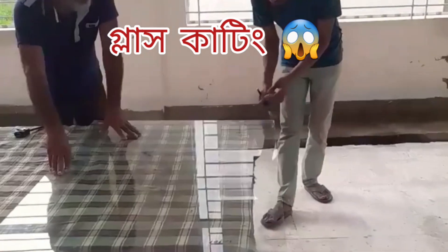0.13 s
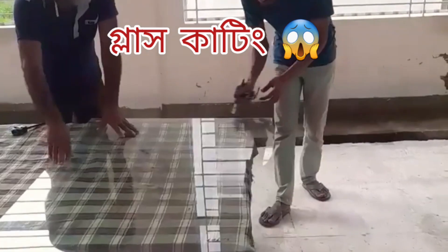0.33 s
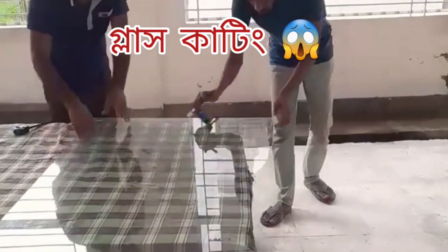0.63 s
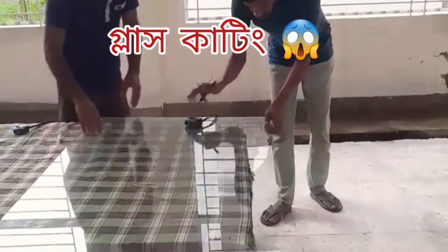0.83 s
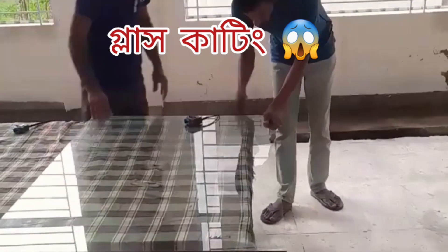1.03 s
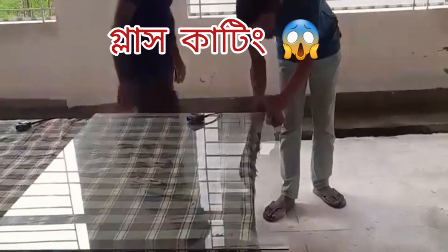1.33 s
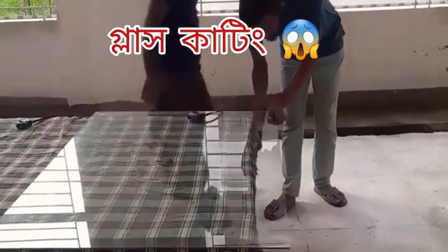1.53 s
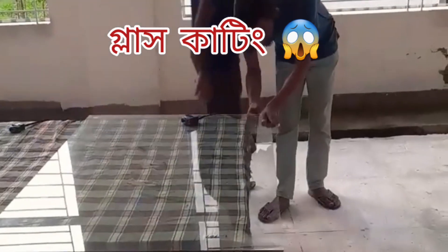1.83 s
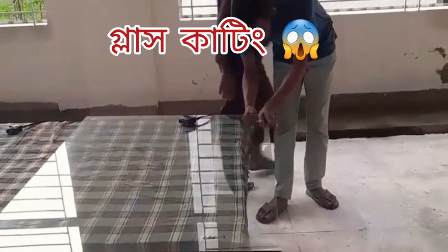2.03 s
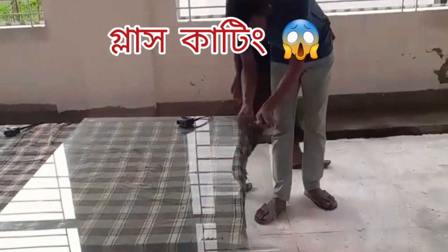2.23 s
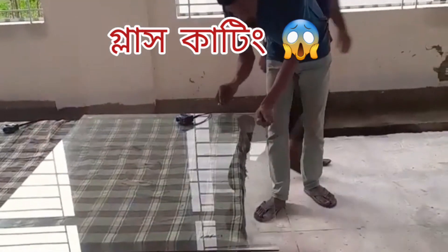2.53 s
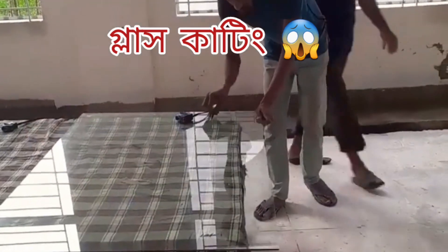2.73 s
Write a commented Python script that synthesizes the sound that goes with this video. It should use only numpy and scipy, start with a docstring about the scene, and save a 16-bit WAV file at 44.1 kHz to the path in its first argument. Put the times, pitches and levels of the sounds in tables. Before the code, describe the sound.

Glass breaking along a score: hard taps, a hollow tool knock, then a loud snap and shimmering ring

```python
"""A bare room, close by a cloth-covered table with a scored glass sheet on it, heard in stereo.
A cutter ticks, taps the glass and is laid down with a knock; the sheet snaps along the score, thumps
on the table, sheds splinters and rings on; the cutter taps it once more. Behind lie rumble, hiss and a hum.
Taps, pings and the strip are sums of damped sines; ticks, rattles, knock, crack and clashes are shaped
noise bursts; the sheet's ring is slightly uneven noise dying band by band; the thump is a sagging sine."""
import sys
import numpy as np
from scipy import signal
from scipy.fft import rfft, irfft, next_fast_len
from scipy.io import wavfile
from scipy.ndimage import map_coordinates

SR = 44100
rng = np.random.default_rng(int(sys.argv[2]) if len(sys.argv) > 2 else 0)


def file_out(sig):
    """Save sig as 16-bit WAV at sys.argv[1]."""
    # one column per channel
    cols = np.atleast_2d(sig).T
    # limit, then scale
    lim = np.clip(cols, -1, 1)
    pcm = np.round(lim * 32767).astype(np.int16)
    wavfile.write(sys.argv[1], SR, pcm)


N = 127008  # samples in the scene

# the crack running along the score, step by step: [t/s, level/dB, t60/s]
CRACK_STEPS = [(1.8948, -12, 0.042), (1.8977, -6.5, 0.017), (1.9000, -20, 0.013), (1.9040, -20, 0.14)]
BAND_LIMIT_HZ = 15350
CONTACT_LEAD_S = 0.00006  # left ahead of right


def amp(db):
    """Decibels to gain."""
    return 10 ** (np.asarray(db) / 20)


def unit(x):
    """Scale to rms 1."""
    return x / np.sqrt(np.mean(x ** 2) + 1e-20)


def along(points, hz):
    """Read a curve of (f/Hz, value) points on a log frequency axis."""
    f, v = np.transpose(points)
    return np.interp(np.log(hz + 1), np.log(f + 1), v)


def curves(rows):
    """One value per sample for each column after the time."""
    s, *columns = np.transpose(rows)
    return [np.interp(np.arange(N) / SR, s, column) for column in columns]


def since(s):
    """Seconds since a moment, zero before it."""
    return np.maximum(np.arange(N) / SR - s, 0)


def wobble(rate):
    """A smooth random curve, rate knots a second."""
    knots = rng.standard_normal(4096)
    return map_coordinates(knots, [np.arange(N) * rate / SR + 2], mode="mirror")


def filtered(x, response):
    """Multiply the spectrum of x by a response of frequency."""
    m = next_fast_len(N + 8192)  # spare length, so that little wraps round
    hz = np.fft.rfftfreq(m, 1 / SR)
    return irfft(rfft(x, m) * response(hz), m)[..., :N]


def sides(pan_db):
    """Left and right gains from their difference in dB (positive is left)."""
    pan_db = np.atleast_1d(pan_db)
    return amp(np.array([pan_db, -pan_db]) / 2)


def place(x, pan_db, lead_s):
    """Level and arrival time differ between the two sides of the microphone; the left leads."""
    ears = np.array([[1], [-1]])
    return filtered(x, lambda hz: sides(pan_db) * np.exp(np.pi * 1j * hz * lead_s * ears))


def noise(colour, alike):
    """Coloured stereo noise of rms 1: mid and side shares set how alike left and right are."""
    def shares(hz):
        turn = np.arccos(np.clip(along(alike, hz), -1, 1)) / 2
        return amp(along(colour, hz)) * [np.cos(turn), np.sin(turn)]

    mid, side = filtered(rng.standard_normal((2, N)), shares)
    return unit(np.array([mid + side, mid - side]))


def fade(s, t60, rise_s):
    """Quick rise at a moment, then exponential decay."""
    t = since(s)
    return (1 - np.exp(-t / rise_s)) * amp(-60 * t / t60)


def ring(s, modes, rise_s):
    """Damped modes set off at a moment, each a decaying sine; 0.75 s long."""
    t = np.arange(SR * 3 // 4) / SR
    sound = sum(amp(db - 60 * t / t60) * np.sin(2 * np.pi * hz * t) for hz, db, t60 in modes)
    sound = sound * (1 - np.exp(-t / rise_s))
    return np.pad(sound, (round(s * SR), N))[:N]


def dying(x, s, t60s):
    """From a moment on, each frequency dies at its own speed."""
    hz, t, z = signal.stft(x, SR, nperseg=256)
    decay = amp(-60 * np.maximum(t - s, 0) / along(t60s, hz)[:, None])
    return signal.istft(z * decay, SR, nperseg=256)[1][:, :N]


def in_room(x, room_db):
    """Add the diffuse tail of the bare walls: noise that dies band by band, fed by the right side."""
    # reverberation of the room: [f/Hz, t60/s]
    room_t60 = [(200, 0.42), (1000, 1), (3000, 0.92), (7000, 1), (15000, 1)]
    tail = dying(rng.standard_normal((2, N)), 0, room_t60)
    tail = tail * (1 - np.exp(-since(0) / 0.00079))  # soft onset, s
    wet = signal.fftconvolve(x[1:], tail / np.linalg.norm(tail[0]), axes=1)[:, :N]
    return x + amp(room_db) * sides(pan_db=-2.5) * wet


def bursts(rows, colour, alike, pan_db):
    """Hard, gritty contacts: each a burst of noise standing for a crowd of short-lived modes."""
    power = sum((amp(db) * fade(s, t60, rise_s=0.00086)) ** 2 for s, db, t60 in rows)
    grit = unit(amp(1.5 * wobble(rate=700)))  # 1.5 dB of roughness
    crowd = noise(colour, [(1000, alike)])
    return place(np.sqrt(power) * grit * crowd, pan_db, CONTACT_LEAD_S)


def background():
    """Rumble and hiss of the surroundings: three bands of noise with drifting levels."""
    # bass and low middle in time: [t/s, bass level/dB, low-middle level/dB]
    low_levels = [(0, -33.5, -33), (.2, -37.5, -34), (.45, -37, -34), (.67, -33.5, -31.5), (.8, -45, -29.5),
                  (1.05, -38.5, -31.5), (1.3, -37.5, -31.5), (1.47, -32.5, -33), (1.58, -36, -28),
                  (1.85, -35, -30.5), (2.0, -40.5, -35.5), (2.25, -39.5, -35.5), (2.38, -43.5, -38.5),
                  (2.55, -39.5, -39), (2.7, -41, -40.5), (2.88, -41, -38)]
    # hiss in time: [t/s, level/dB]
    hiss_level = [(0, -41.5), (.6, -41.5), (1.25, -42), (1.65, -39), (1.88, -42), (2.0, -40.5), (2.8, -47)]
    # spectra of the three bands: [f/Hz, level/dB]
    bass_colour = [(20, -38), (32, -19), (40, -2), (47, -1), (65, -4.5), (100, -3.5), (130, -10.5),
                   (200, -16.5), (400, -64)]
    rumble_colour = [(70, -71), (130, 0), (165, -1.5), (240, -5.5), (320, -3), (450, -7), (620, -6),
                     (900, -16.5), (1300, -21.5), (3000, -46.5)]
    hiss_colour = [(300, -64), (900, 1.5), (1900, 4.5), (2700, -5), (4500, -6), (7000, -11), (8500, -16),
                   (11000, -13), (14000, -15.5), (15500, -48)]
    # likeness of left and right: [f/Hz, correlation]
    likeness = [(60, 0.88), (160, 1), (350, 0.78), (700, 0.068), (1500, 0.028), (5000, 0.027)]
    # balance: [f/Hz, left minus right/dB]
    balance = [(40, -1), (150, -2.3), (400, -2.5), (1500, -3), (12000, -2)]
    levels = curves(low_levels) + curves(hiss_level)
    colours = (bass_colour, rumble_colour, hiss_colour)
    layers = sum(amp(db) * noise(colour, likeness) for db, colour in zip(levels, colours))
    return filtered(layers, lambda hz: sides(along(balance, hz)))


def tone(hz, drift_hz, flutter_db):
    """A sine of rms 1 whose pitch and level wander slightly."""
    turns = np.cumsum(hz + drift_hz * wobble(rate=14)) / SR
    return unit(np.sin(2 * np.pi * turns) * amp(flutter_db * wobble(rate=22)))


def hum():
    """A distant machine sings one wavering note over low drones."""
    # the note in time: [t/s, level/dB]
    note_level = [(0, -28.5), (.3, -34.5), (.7, -34), (1.2, -35), (1.85, -33), (1.93, -43), (2.3, -36),
                  (2.85, -42)]
    # drones that swell and fade: [middle t/s, half length/s, f/Hz, level/dB]
    swells = [(0.23, 0.72, 99, -36.5), (1.614, .1, 167, -29), (2.54, 0.22, 167, -43.5),
              (1.45, 0.34, 49, -43.5)]
    note = amp(curves(note_level)[0]) * tone(541.3, drift_hz=2.97, flutter_db=2.0)
    drones = 0
    for s, half, hz, db in swells:
        swell = np.exp(-((since(0) - s) / half) ** 2 / 2)
        drones = drones + amp(db) * swell * tone(hz, drift_hz=1.47, flutter_db=2.5)
    return place(note, pan_db=-6, lead_s=0.00032) + drones


def cutter_handle():
    """The handle drops flat and bounces: hollow knocks, the first of which sets its modes ringing."""
    # landing and bounces: [t/s, level/dB, t60/s]
    landings = [(0.7770, -4.5, .016), (0.7850, -21, 0.037), (0.7950, -18, 0.045), (0.8045, -22, 0.1),
                (0.8420, -25, 0.038), (0.8710, -25.5, .08)]
    # spectrum of a knock: [f/Hz, level/dB]
    knock_colour = [(200, -25), (480, -15), (660, 1), (850, 2), (1080, 0), (1250, -10), (1450, -13),
                    (1780, -7), (2600, -23), (6000, -25), (15000, -29)]
    # modes of the handle: [f/Hz, level/dB, t60/s]
    handle_modes = [(625, -39, 0.27), (780, -33, .2), (830, -28, 0.16), (915, -20, 0.14), (1030, -25, 0.11),
                    (1150, -26, 0.16), (1726, -25, 0.089)]
    body = ring(landings[0][0], handle_modes, rise_s=0.0016)
    body = place(body, pan_db=-1, lead_s=CONTACT_LEAD_S)
    knocks = bursts(landings, knock_colour, alike=0.23, pan_db=-5.0)
    return in_room(body + knocks, room_db=-5.5)


def cutter_parts():
    """The wheel ticks and skids, its steel holder pings and the loose metal parts rattle."""
    # rattles, wheel ticks and skids between contacts: [t/s, level/dB, t60/s]
    rattle_rows = [(0.6880, -22.5, 0.06), (0.7382, -19, 0.037), (0.7450, -28, 0.025), (0.7775, -23, 0.017),
                   (2.8445, -21, 0.071), (2.8600, -34, 0.074)]
    tick_rows = [(0.3168, -33, 0.046), (0.3265, -33, 0.07), (0.3350, -25, 0.02), (0.3374, -17, 0.015),
                 (0.6876, -19.5, 0.012), (0.6940, -30, 0.0086), (0.7765, -18, 0.011), (0.8018, -26, .008),
                 (0.8410, -23, 0.0098), (2.8450, -22, .014)]
    skid_rows = [(0.335, -37.5, 0.4), (0.692, -27, 0.64), (0.838, -31, 0.35)]
    # their spectra: [f/Hz, level/dB]
    rattle_colour = [(500, 1), (1500, -5), (2600, 1), (3700, -3), (5400, -4.5), (6800, -6.5), (9000, -13.5),
                     (12000, -12.5), (15500, -34)]
    tick_colour = [(1000, -23), (2500, -1), (3300, -6), (5000, 3.5), (8500, -6), (10800, -4), (11900, 10),
                   (12900, 2), (15500, -8)]
    skid_colour = [(1500, 5.5), (4000, -2), (7000, -5), (9000, -6.5), (12000, -12), (15000, -4)]
    # pings of the holder: [t/s, level/dB]
    ping_rows = [(0.74, -23), (0.75, -22), (0.766, -20), (0.8400, -34), (2.8429, -17.5), (2.853, -20),
                 (2.8714, -17)]
    # modes of the holder: [f/Hz, level/dB, t60/s]
    ping_modes = [(4600, -11, .04), (4830, -10, 0.061), (5360, -4.5, 0.03), (5530, -2.5, 0.028),
                  (5840, -9.5, 0.039), (6520, -19, 0.04)]
    rattle = in_room(bursts(rattle_rows, rattle_colour, alike=0.24, pan_db=-6.5), room_db=1.5)
    ticks = in_room(bursts(tick_rows, tick_colour, alike=0.17, pan_db=-8.0), room_db=-12.5)
    pings = sum(amp(db) * ring(s, ping_modes, rise_s=0.00094) for s, db in ping_rows)
    pings = in_room(place(pings, pan_db=-8.0, lead_s=0.00003), room_db=-23)
    skids = bursts(skid_rows, skid_colour, alike=0.1, pan_db=-1)
    return rattle + ticks + pings + skids


def cutter_taps():
    """The head strikes the damped sheet, early reflections follow from nearby surfaces; the spot picks the modes."""
    # taps and their early reflections: [t/s, level/dB, left minus right/dB, spot struck (0 first, 1 second)]
    tap_rows = [(0.6855, 1.5, -7.5, 0), (0.6897, -18, -4, 0), (0.6929, -25, 2, 0), (0.6957, -15, -4, 0),
                (0.7380, -8, -4, 0), (2.8430, -3, -8, 1), (2.8462, -28, 10, 1)]
    # modes of a tap: [f/Hz, level at first spot/dB, level at second spot/dB, t60/s]
    tap_modes = [(820, -21, -35, 0.028), (1225, -19.5, -20.5, 0.036), (1882, -14, -4.5, 0.025),
                 (2095, -14, -12.5, 0.062), (2223, -5, -28, 0.024), (2410, -10, -25, 0.031),
                 (2734, 2.4, 5.2, 0.015), (2880, -6.5, -2.2, 0.028), (3110, -14.5, -12, 0.046),
                 (3825, -23, -25, 0.039)]
    attack_s = 0.0014
    taps = 0
    for s, db, pan, spot in tap_rows:
        modes = [(hz, second if spot > 0.5 else first, t60) for hz, first, second, t60 in tap_modes]
        soft_contact = 1 - np.exp(-since(s) / attack_s)  # on top of the rise inside ring
        arrival = soft_contact * ring(s, modes, attack_s)
        taps = taps + amp(db) * place(arrival, pan, lead_s=0.00008)
    return in_room(taps, room_db=-13.5)


def thump():
    """The halves of the sheet drop onto the padded table: a low sine sagging in pitch as they settle."""
    start_s = 1.8995
    hz = 42 + 40 * np.exp(-since(start_s) / 0.0096)  # from 82 Hz down to 42 Hz
    turns = np.cumsum(hz * (since(start_s) > 0)) / SR
    return amp(-14.5) * fade(start_s, t60=0.079, rise_s=0.0019) * np.sin(2 * np.pi * turns)


def splinters():
    """Tiny chips tick at random along the break, ever fainter, each a short decaying sine."""
    rate, crackle_t60 = 320, 0.96  # chips a second; fade of the crackle, s
    typical_db, spread_db = -22.5, 1.5
    typical_hz, spread_octaves, cycles = 4200, 0.48, 42  # a chip falls 60 dB in so many cycles
    jitter, size, pitch, side = rng.standard_normal((180, 4)).T
    delay = np.abs(np.arange(len(jitter)) + jitter) / rate
    steps = np.arange(600)  # samples in a chip
    hz = np.minimum(typical_hz * 2 ** (spread_octaves * pitch), BAND_LIMIT_HZ)
    turns = hz[:, None] * steps / SR
    level_db = typical_db + spread_db * size - 60 * delay / crackle_t60
    chips = amp(level_db[:, None] - 60 * turns / cycles) * np.sin(2 * np.pi * turns)
    at = ((CRACK_STEPS[0][0] + delay) * SR).astype(int)[:, None] + steps
    gains = sides(5 * side)  # 5 dB scatter around the middle
    return np.array([np.bincount(at.ravel(), (chips * g[:, None]).ravel(), N)[:N] for g in gains])


def sheet_modes():
    """A dense crowd of modes as noise, slightly uneven from frequency to frequency."""
    # spectrum of the ring as it reaches the listener, with a dip near 9 kHz: [f/Hz, level/dB]
    sheet_colour = [(700, -28), (1300, -23), (1650, -8.5), (2100, 1), (3050, 1), (4000, 2), (4800, -5),
                    (5800, -2), (6900, 4), (7700, -1.5), (8700, -21), (9400, -2), (10000, 1), (11400, 3.5),
                    (12400, 0.5), (13300, 4), (15000, 2.5), (15600, -20)]
    strengths = rng.standard_normal(4096)

    def uneven(hz):
        # 1.6 dB scatter, one random knot every 14 Hz
        return amp(1.6 * map_coordinates(strengths, [hz / 14], mode="mirror"))

    return unit(filtered(noise(sheet_colour, [(1000, 0.021)]), uneven))


def snap():
    """The crack runs, the sheet's modes and the freed strip ring out, and the fresh edges clash."""
    # spectra of crack and clashes as picked up, with the recorder's dip near 9 kHz: [f/Hz, level/dB]
    crack_colour = [(500, -15), (1400, -17), (2900, 3.5), (4800, -8.5), (6800, 0), (8700, -19), (11200, -2),
                    (12500, -7), (15500, -18)]
    clash_colour = [(1500, -12.5), (3000, -8), (4800, -8), (5700, -1), (6400, -4), (7050, 0), (7800, -6),
                    (9000, -30), (15000, -22)]
    # decay of the sheet: [f/Hz, t60/s]
    sheet_t60 = [(1500, 1.74), (3000, 1.84), (7000, 1.32), (11000, 1.01), (15000, 0.56)]
    # strongest modes of the freed strip: [f/Hz, level/dB, t60/s]
    strip_modes = [(2858, -8, .9), (3123, -8, .9), (5141, -9, .7), (5380, -7, .7), (5764, -4, .6),
                   (6157, -8, .7), (6225, -6, .7), (6698, -8, .7), (6786, -7, .7), (6860, -6, .6),
                   (7030, -3, .65), (10380, -7, .65), (10896, -9, .8), (14335, -11, .5)]
    # clashes of the fresh edges: [t/s, level/dB, t60/s]
    clash_rows = [(1.9238, -16, 0.068), (1.9328, -15, 0.065), (1.9480, -24, .05), (1.9660, -33, .04),
                  (1.9995, -24, 0.06), (2.0085, -21, 0.082), (2.0270, -21, 0.045)]
    crack = in_room(bursts(CRACK_STEPS, crack_colour, alike=0.47, pan_db=-6.0), room_db=-15)
    start = CRACK_STEPS[0][0]
    swell = 1 - np.exp(-since(start) / 0.019)  # silent until the crack starts
    chatter = amp(0.6 * wobble(rate=89))
    shimmer = dying(sheet_modes(), start, sheet_t60) * swell * chatter
    sheet = amp(-17) * sides(pan_db=-3) * shimmer
    strip = amp(-31.5) * place(ring(1.925, strip_modes, rise_s=0.0035), pan_db=-8, lead_s=0)
    clash = bursts(clash_rows, clash_colour, alike=0.1, pan_db=-2)
    return crack + sheet + strip + clash


def scene():
    """Everything in the room, from the far background to the glass."""
    surroundings = background() + hum()
    cutter = cutter_handle() + cutter_parts() + cutter_taps()
    glass = thump() + splinters() + snap()
    return surroundings + cutter + glass


def record(dry):
    """The recorder clips at full scale, then cuts steeply above its band limit."""
    return filtered(np.clip(dry, -1, 1), lambda hz: 1 / (1 + (hz / BAND_LIMIT_HZ) ** 160))


dry = scene()
out = record(dry)
file_out(out)
```